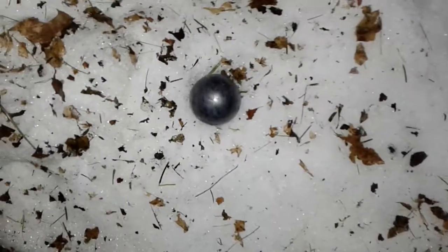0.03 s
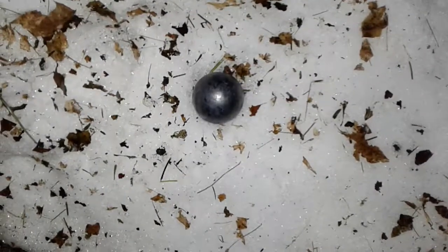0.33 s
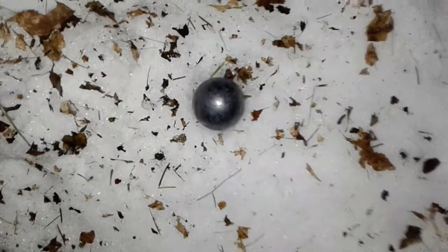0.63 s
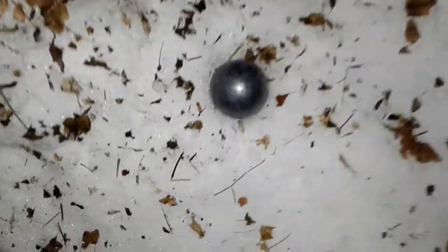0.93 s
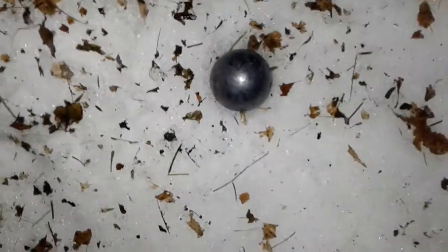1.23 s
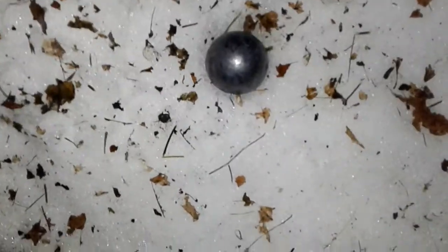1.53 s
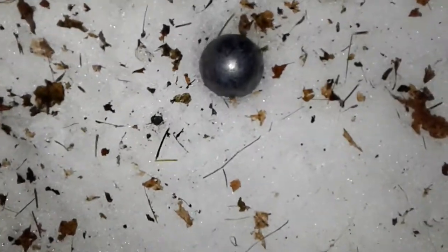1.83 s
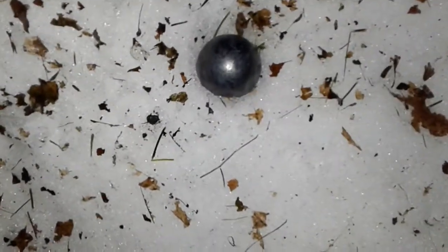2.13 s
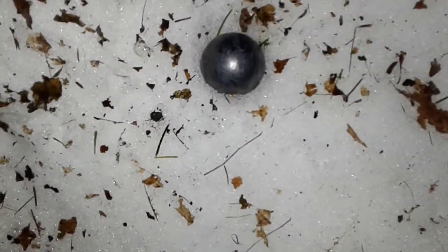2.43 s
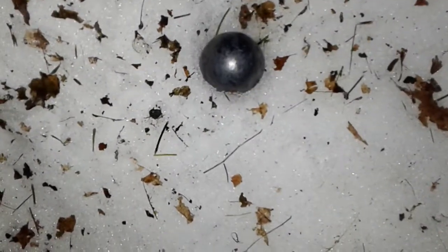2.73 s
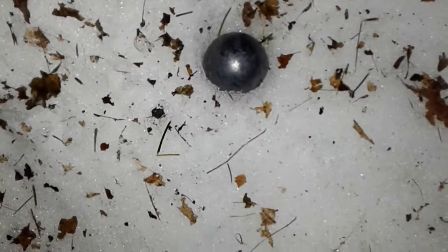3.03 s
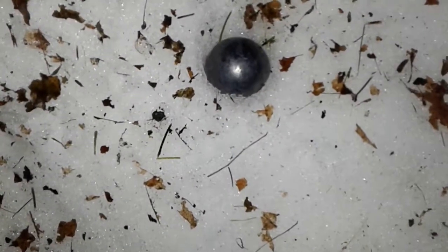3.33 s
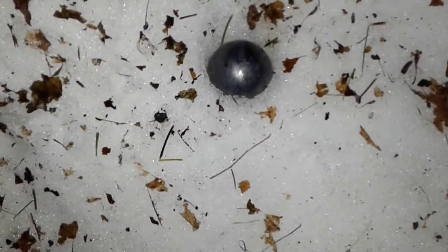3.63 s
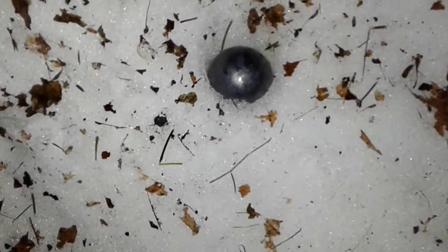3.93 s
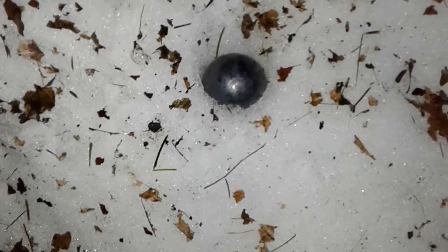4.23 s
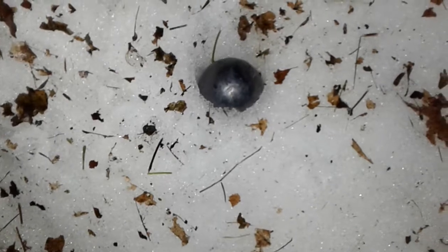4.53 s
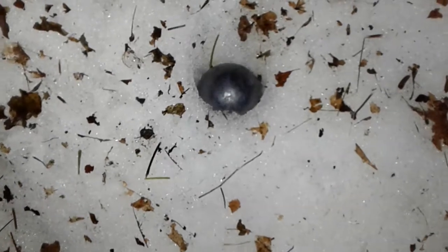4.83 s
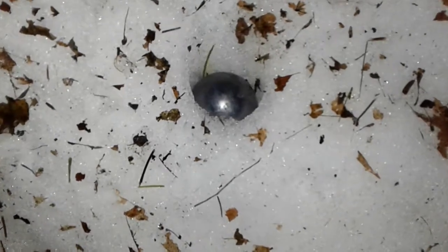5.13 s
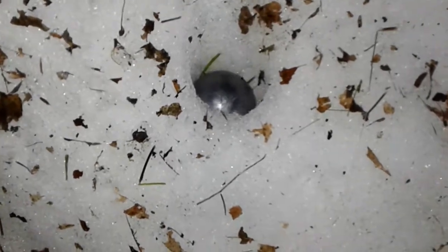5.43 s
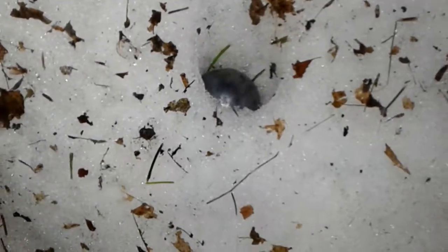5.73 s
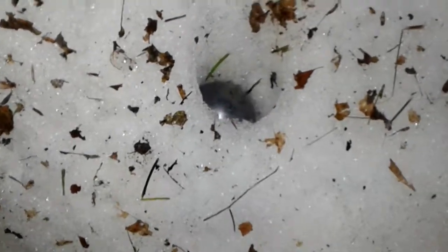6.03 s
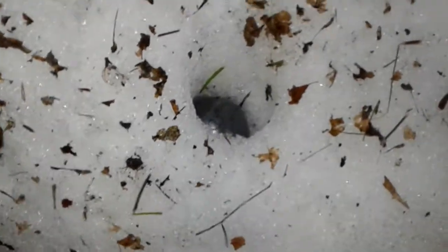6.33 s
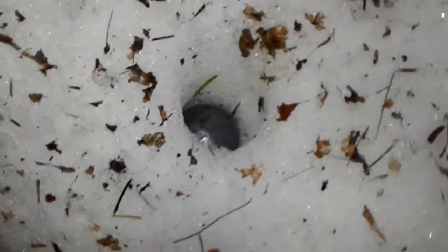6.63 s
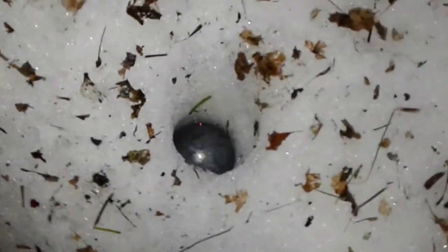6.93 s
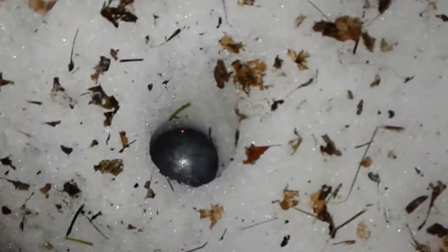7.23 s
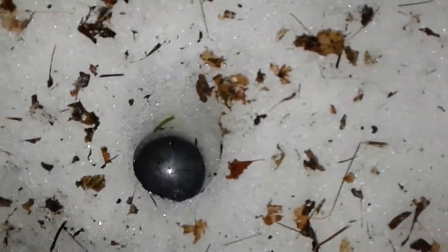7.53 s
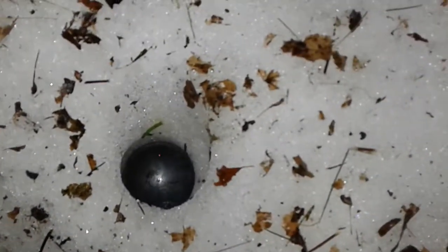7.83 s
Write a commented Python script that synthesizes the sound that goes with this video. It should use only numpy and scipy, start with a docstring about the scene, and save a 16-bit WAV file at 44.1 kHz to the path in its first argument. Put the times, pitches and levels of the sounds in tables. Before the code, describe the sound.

A very hot metal ball rests on snow outdoors, close to the microphone, fizzing thinly over a faint simmer. Gusts of wind thud and flutter, mostly on the left, and a few ice grains tick. About five seconds in, with the wind now weaker, the ball sinks and meltwater boils into a louder, sputtering hiss with brief spits. The wind thumps again near the end.

```python
"""A very hot metal ball melts its way into snow, outdoors, close to a camera with two microphone ports.
At first it fizzes thinly on a film of steam, with a soft simmer underneath. Then meltwater touches the
metal and boils, hissing and spitting in the hole. A few ice grains snap. Gusts of wind thud and flutter
on the exposed left port and rumble on the sheltered right one, over a soft outdoor background."""
import sys
import numpy as np
from scipy import signal
from scipy.fft import rfft, irfft, next_fast_len
from scipy.io import wavfile
from scipy.ndimage import uniform_filter1d

SR = 44100
rng = np.random.default_rng(int(sys.argv[2]) if len(sys.argv) > 2 else 0)


def dump(signal):
    """Clip the signal to [-1, 1] and save it as 16-bit WAV at the path in sys.argv[1]."""
    limited = np.clip(np.atleast_2d(signal).T, -1, 1)
    pcm = np.round(limited * 32767).astype(np.int16)
    wavfile.write(sys.argv[1], SR, pcm)


N = 356769
TIME = np.arange(N) / SR
EDGE_HZ = 15800  # the sound is cut off above this
FRAME, HOP = 512, 128  # the hiss is built in short overlapping frames: length and step in samples
FRAME_S = np.arange(N // HOP + 5) * HOP / SR
BIN_HZ = np.fft.rfftfreq(FRAME, 1 / SR)


def steam(film_db=4, boil_db=4.5, waver_db=0.5, sputter_db=0.6, patchy_db=1.34):
    """The steam film fizzes and the meltwater boils, together making one sputtering hiss."""
    # tone of the fizz: (frequency [Hz], relative level [dB])
    film_colour = [(500, -44), (1500, -22), (2300, -15.5), (3800, -11), (4600, -10), (6000, -2.5),
                   (7400, -3), (8800, 0), (10500, 0), (12000, 0), (14000, -0.5), (15600, 1)]
    # narrow bands where the camera body rings: (frequency [Hz], width [octaves], boost [dB])
    case_modes = [(4460, .07, 2.5), (6800, 0.035, 1), (9330, 0.05, 1.16)]
    t = FRAME_S[:, None]
    film, boil = steam_levels(t)
    film = film * amp(film_db + waver_db * wobble(frames=36)) * hiss_shape(read(film_colour, BIN_HZ))
    boil = boil * amp(boil_db) * hiss_shape(boiling_colour(t))
    gain = np.hypot(film, boil)
    sputter = wobble(frames=7)
    # small patches of time and frequency get randomly louder or softer
    patches = uniform_filter1d(rng.standard_normal(gain.shape), size=16, axis=0)
    patches = evened(uniform_filter1d(patches, size=7, axis=1))
    gain = gain * amp(peaks_db(case_modes) + sputter_db * sputter + patchy_db * patches)
    return hiss_at_ports(gain, t)


def steam_levels(t, dry_db=-9):
    """How strong the fizz and the boiling are: both surge when the ball slips against fresh snow."""
    # fizz of the steam film, thicker once the ball sinks: (time [s], relative level [dB])
    film_levels = [(0, -49), (1.55, -47), (1.72, -44), (2.2, -47.5), (2.9, -45.5), (3.6, -48.5),
                   (4.5, -48.5), (5.14, -41.5), (5.19, -34), (5.55, -42.5), (6.5, -33), (6.8, -41.5),
                   (8.09, -43)]
    # boiling where water touches the metal: (time [s], relative level [dB])
    boil_levels = [(4.5, -71), (4.9, -55), (5.14, -48), (5.2, -40), (5.7, -32), (6.55, -32), (6.78, -35.5),
                   (7.12, -37), (7.4, -38), (7.7, -37), (8.09, -37)]
    # surges of steam: (start [s], length [s], relative fizz level [dB], relative boiling level [dB])
    surges = [(4.602, 0.061, -37, -52.5), (4.924, 0.084, -42, -58), (5.984, .07, -33, -36.5),
              (6.205, 0.071, -31.5, -41), (6.555, 0.065, -33, -31), (7.03, .1, -38, -39),
              (7.58, 0.12, -38, -39)]
    film_holds = t < boil_levels[0][0]  # hardly any water reaches the metal yet
    film = amp(curve(film_levels, t)[0])
    boil = amp(curve(boil_levels, t)[0] + dry_db * film_holds)
    for start, length, fizz_db, boil_db in surges:
        surge = swell(t, start, length, rise_s=0.047, fall_s=0.1)
        film = np.hypot(film, amp(fizz_db) * surge)
        boil = np.hypot(boil, amp(boil_db) * surge)
    return film, boil


def boiling_colour(t):
    """The tone of the boiling, in dB, shifts as water pools and the ball sinks in its ringing hole."""
    # tone of water boiling on the metal: (frequency [Hz], relative level [dB])
    contact_colour = [(200, -33), (500, -23.5), (900, -12), (1500, -8), (2400, -8), (3100, -4.5),
                      (4000, -5), (5000, -5), (5900, -1), (7300, -2), (9000, -3), (11000, -5), (13000, -8),
                      (15600, -9.5)]
    # tone of pooled water boiling: (frequency [Hz], relative level [dB])
    pool_colour = [(200, -23), (500, -21), (900, -9), (1500, -8), (2400, -1), (3100, 1), (4000, -2.5),
                   (5000, 0.5), (5900, 4.5), (7300, -3.5), (9000, 5), (11000, -5), (13000, -8.5),
                   (15600, -7)]
    # the hole around the ball: (time [s], share of boiling from pooled water [0-1], lowest ring [Hz])
    hole = [(4.6, 0., 2150), (5.2, 0.86, 2260), (5.7, 0., 1750), (6.1, 0.46, 1790), (6.5, 0.53, 2470),
            (6.9, 0.2, 2380), (7.35, 0.7, 2190), (8.09, 0.9, 2440)]
    # bands where the hole rings: (multiple of the lowest ring, width [octaves], boost [dB])
    hole_modes = [(1., 0.21, 3), (2.45, 0.11, 0.5)]
    pooled, hole_hz = curve(hole, t)
    water_db = (1 - pooled) * read(contact_colour, BIN_HZ) + pooled * read(pool_colour, BIN_HZ)
    ring_db = sum(db * hump(BIN_HZ, multiple * hole_hz, octaves) for multiple, octaves, db in hole_modes)
    return water_db + ring_db


def steam_bursts(per_s=4000, spread_db=3, pop_share=0.28):
    """Tiny steam bursts pop in a smooth rush of vapour; gives one spectrum for each frame."""
    count = len(FRAME_S) * HOP
    pops = evened(random_kicks(count, per_s, spread_db))
    rush = rng.standard_normal(count)
    hiss = np.sqrt(pop_share) * pops + np.sqrt(1 - pop_share) * rush
    return signal.stft(hiss, nperseg=FRAME, noverlap=FRAME - HOP)[2].T[:len(FRAME_S)]


def hiss_at_ports(gain, t):
    """The two ports sit apart, so they hear nearly the same low hiss but different treble."""
    # where the ball lies: (time [s], left port boost [dB], direction [0 ahead, 1 to the side])
    aim = [(0, 2, 0.9), (4.6, 2, 1.), (5.7, 2.5, 1), (6.4, 1, 0.78), (6.9, 2.5, 0.54), (7.3, 2, 0.2),
           (8.09, 3.5, 0.)]
    # how alike the hiss is at the two ports: (frequency [Hz], likeness [0-1])
    likeness = [(500, 0.97), (1700, 0.84), (3300, 0.65), (4300, 0.6), (5200, 0.52), (6500, 0.4),
                (7500, 0.74), (9000, 0.03), (13000, 0.05)]
    # how far the left wave leads with the ball to the side: (frequency [Hz], phase [radians])
    phase_aside = [(1000, 0), (2200, -0.7), (3000, -3.3), (4000, -6), (4500, -6.6), (5500, -8.8),
                   (6800, -11.3), (8200, -10.3), (10500, -12), (12000, -13.5), (15600, -22)]
    # the same with the ball straight ahead: (frequency [Hz], phase [radians])
    phase_ahead = [(1000, 0.2), (2500, 0.1), (3400, -0.1), (4300, 1.6), (5200, 0.1), (6200, -0.4),
                   (7000, -2), (7700, 0.6), (10000, -1), (15600, -2.7)]
    # tone of the left port against the right: (frequency [Hz], relative level [dB])
    left_colour = [(1100, -2), (2100, 2.5), (2700, -2), (3300, -8), (4600, -2.1), (5300, -3.5), (6500, -6),
                   (7400, -9.5), (8700, -2.5), (9800, -5), (11500, -11), (13000, -15.5), (15600, -4.5)]
    # narrow peaks and dips of the left port: (frequency [Hz], width [octaves], boost [dB])
    left_ripple = [(1980, 0.051, 0.5), (3270, 0.1, 0), (7600, 0.043, -3.5), (11500, .05, -2),
                   (12500, .05, 3)]
    left_db, aside = curve(aim, t)
    right, unrelated = steam_bursts(), steam_bursts()
    alike = np.clip(read(likeness, BIN_HZ), 0, 1)
    left = alike * right + np.sqrt(1 - alike ** 2) * unrelated
    turn_aside = np.exp(1j * read(phase_aside, BIN_HZ))
    turn_ahead = np.exp(1j * read(phase_ahead, BIN_HZ))
    lead = np.angle(aside * turn_aside + (1 - aside) * turn_ahead)
    left = left * np.exp(1j * lead) * amp(read(left_colour, BIN_HZ) + peaks_db(left_ripple) + left_db)
    ports = gain * np.array([left, right])
    return signal.istft(ports.transpose(0, 2, 1), nperseg=FRAME, noverlap=FRAME - HOP)[1][:, :N]


def simmer(hz=2150, octaves=0.3, right_db=-5):
    """Vapour escapes through the narrow gap under the ball, which rings broadly."""
    # soft simmer under the ball: (time [s], level at the left port [dB])
    levels = [(0, -66.5), (.8, -64.5), (1.25, -62), (1.55, -61.5), (2.0, -54.5), (2.3, -62.5), (2.7, -66),
              (3.2, -92), (4.4, -68), (5., -63)]
    vapour = noise_band(N, hz, octaves)
    return amp(curve(levels, TIME)[0]) * vapour * amp([[0], [right_db]])


def spits():
    """Steam spits out in puffs of noise that rise quickly and fall more slowly."""
    # puffs: (time [s], level [dB], pitch [Hz], width [octaves], rough length [s], left over right [dB])
    puffs = [(0.997, -35.5, 10300, 0.19, 0.024, -7), (4.63, -40.5, 5730, .5, 0.036, -2),
             (6.445, -35.5, 2150, 0.3, 0.041, 14), (6.586, -32, 1790, 0.3, 0.06, 12),
             (6.593, -38, 766, 0.47, 0.096, 4), (6.704, -29.5, 4000, 5.6, 0.025, 8),
             (7.077, -43, 8640, 0.18, 0.26, 18)]
    out = np.zeros((2, N))
    t = np.arange(SR // 4) / SR
    for start, db, hz, octaves, length, pan_db in puffs:
        puff = noise_band(len(t), hz, octaves) * rise_and_fade(t, peak_s=length / 4)
        add(out, start, panned(puff, db, pan_db))
    return out


def ice_ticks():
    """A grain of ice snaps and rings for a few cycles."""
    # snaps: (time [s], level [dB], ring [Hz], time to peak [s], left over right [dB])
    snaps = [(1.242, -16.5, 6460, 0.00014, 8), (1.342, -30, 5570, 0.00014, 0),
             (3.8412, -19, 14300, 0.000062, -12)]
    out = np.zeros((2, N))
    t = np.arange(400) / SR
    for start, db, hz, peak_s, pan_db in snaps:
        ring = rise_and_fade(t, peak_s) * np.sin(2 * np.pi * hz * t)
        add(out, start, panned(ring, db, pan_db))
    return out


def wind(top_hz=1200, rise_s=0.046, fall_s=0.053):
    """Gusts ride on a breeze: big swirls of air thud, small ones flutter, the sheltered port rumbles."""
    # breeze between gusts: (time [s], relative level on the left [dB], on the right [dB])
    breeze = [(0, -55, -47), (.35, -45, -46), (.9, -29.5, -44), (1.1, -27.5, -36.5), (1.4, -26.5, -37),
              (1.8, -40, -49), (2.2, -36, -57), (2.8, -35, -55), (3.2, -39.5, -53), (4.1, -42, -57.5),
              (4.9, -37, -55), (5.6, -44.5, -62), (6.5, -52, -57), (6.75, -43.5, -58), (7.2, -51.5, -59),
              (7.3, -39, -42), (7.75, -36.5, -52), (8.09, -36, -33)]
    # gusts on the exposed left port: (start [s], length [s], level [dB], small swirls against big [dB])
    gusts = [(0.112, .16, -34, -43), (0.31, 0.074, -23, -20.5), (.46, 0.04, -25, -26),
             (.58, 0.076, -23.5, -17), (0.664, 0.077, -18, -16), (0.812, 0.09, -21, -22),
             (1.042, 0.07, -20.5, -15), (1.137, 0.15, -17.5, -9.5), (1.448, 0.051, -21.5, -15),
             (1.622, 0.058, -21.5, -10.5), (1.712, 0.02, -34.5, 4.5), (1.874, .09, -32, -1),
             (1.999, 0.27, -30.5, -2), (2.344, 0.22, -33.5, -5), (2.71, 0.14, -33, -5),
             (2.916, .17, -31.5, -3), (3.262, 0.029, -32, -9), (3.345, 0.097, -29.5, -10),
             (3.48, 0.34, -40, -9), (3.887, 0.14, -34, -8.5), (4.198, .13, -32, -7.5),
             (4.391, .13, -33, -8), (4.56, 0.067, -33, -7), (4.765, 0.087, -34.5, -11),
             (4.896, 0.22, -35, -2), (5.15, 0.098, -39, -0.5), (5.346, 0.019, -35.5, -2),
             (5.424, 0.029, -33, -9.5), (5.507, .11, -42, -5.5), (5.746, 0.089, -34, -16),
             (5.852, 0.071, -31.5, -8.5), (6.066, 0.057, -35, -14), (6.32, 0.029, -36.5, -23),
             (6.827, 0.1, -34, -15.5), (7.067, 0.075, -34, -21), (7.386, 0.038, -26, -16),
             (7.506, 0.17, -26, -17.5), (7.739, 0.21, -21.5, -16)]
    # stray gusts on the sheltered right port: (start [s], length [s], relative level [dB])
    stray_gusts = [(2.56, 0.17, -47), (3.016, 0.033, -45), (6.18, 0.065, -50), (6.42, 0.036, -48.5),
                   (6.66, 0.085, -50)]
    # tone of the wind on the left: (frequency [Hz], relative level [dB])
    exposed_colour = [(15, -58), (25, -41), (86, -1), (139, 4), (192, 2.5), (401, -5), (528, -10),
                      (977, -31), (1500, -38.5), (1950, -69), (3300, -120)]
    # tone of the wind on the right: (frequency [Hz], relative level [dB])
    sheltered_colour = [(20, -43), (50, -1), (90, 0), (150, -2.5), (250, -16), (400, -33), (800, -60)]
    big, sheltered = amp(curve(breeze, TIME))
    small = big * amp(-16)  # small swirls are weak between gusts
    for start, length, db, small_db in gusts:
        gust = amp(db) * swell(TIME, start, length, rise_s, fall_s)
        big = np.hypot(big, gust)
        small = np.hypot(small, amp(small_db) * gust)
    for start, length, db in stray_gusts:
        sheltered = np.hypot(sheltered, amp(db) * swell(TIME, start, length, rise_s, fall_s))
    kicks = swirls(exposed_colour, top_hz, per_s=550, spread_db=3)
    thud = coloured(kicks, lambda f: 1 / (1 + (f / 360) ** 6))  # big swirls lie below 360 Hz
    left = big * steady(thud, samples=3200) + small * steady(kicks - thud, samples=3200)
    rumble = swirls(sheltered_colour, top_hz, per_s=710, spread_db=1.5)
    right = amp(0.5) * sheltered * steady(rumble, samples=3000)
    return np.array([left * flutter(depth_db=1.98, hz=12.6), right * flutter(depth_db=2.5, hz=6.3)])


def swirls(colour, top_hz, per_s, spread_db):
    """Swirls of air cross a port as separate dull kicks of pressure."""
    kicks = random_kicks(N, per_s, spread_db)
    return coloured(kicks, lambda f: amp(read(colour, f)) / np.hypot(1, (f / top_hz) ** 4))


def flutter(depth_db, hz):
    """Swirls come in bunches: a gain that wanders about hz times a second."""
    return amp(depth_db * noise_band(N, hz, octaves=1))


def buffets():
    """One strong swirl of air sucks and then pushes on the left port."""
    # the hardest blows of the wind: (time [s], peak level [dB], main frequency [Hz])
    blows = [(0.711, -16, 310), (0.84, -21, 273), (1.145, -17, 380), (1.162, -9, 298), (1.218, -17, 416),
             (1.652, -25, 418), (1.737, -20, 520), (1.915, -20.5, 473), (2.065, -21, 453),
             (2.143, -24, 487), (4.444, -21.5, 380), (7.761, -10.5, 243)]
    out = np.zeros((2, N))
    t = np.arange(-400, 400) / SR
    for middle, db, hz in blows:
        phase = 2 * np.pi * hz * t
        pressure = amp(db) * phase * np.exp((1 - phase ** 2) / 2)
        add(out, middle + t[0], np.outer([1, 0], pressure))
    return out


def air(level_db=-57.5, top_hz=3500):
    """A soft, steady outdoor background, separate in each port."""
    # tone of the background: (frequency [Hz], relative level [dB])
    colour = [(60, 0), (300, -2), (430, -5), (520, -1.5), (620, 3.5), (760, -2.5), (900, -1), (1200, -6.5),
              (1800, -8.5), (3000, -36)]
    gain = lambda f: amp(read(colour, f)) / np.hypot(1, (f / top_hz) ** 2)
    return amp(level_db) * np.array([evened(coloured(rng.standard_normal(N), gain)) for _ in range(2)])


def amp(db):
    """Turns decibels into a gain."""
    return 10 ** (np.asarray(db) / 20)


def evened(x):
    """Scales x to an average (rms) level of 1."""
    return x / np.sqrt(np.mean(x ** 2) + 1e-20)


def steady(x, samples):
    """Evens out slow changes of level and leaves the fast lumps."""
    power = uniform_filter1d(uniform_filter1d(x ** 2, samples), samples)
    return x / np.sqrt(abs(power) + 1e-12)


def curve(rows, t):
    """Looks up each column of a table at the times t."""
    times, *columns = np.transpose(rows)
    return [np.interp(t, times, column) for column in columns]


def read(points, hz):
    """Looks up a table at the frequencies hz, with octaves evenly spaced."""
    f, value = np.transpose(points)
    return np.interp(np.log(hz + 1), np.log(f + 1), value)


def hump(f, hz, octaves):
    """A bell curve around hz, with its width in octaves."""
    return np.exp(-.5 * (np.log2((f + 1) / hz) / octaves) ** 2)


def peaks_db(rows):
    """Adds narrow peaks and dips into one tone curve."""
    return sum(db * hump(BIN_HZ, hz, octaves) for hz, octaves, db in rows)


def hiss_shape(db):
    """Turns a tone curve into gains that keep the overall power the same."""
    gain = amp(db) * (BIN_HZ < EDGE_HZ + 300)
    return gain / np.sqrt(np.mean(gain ** 2, axis=-1, keepdims=True))


def coloured(x, gain):
    """Filters x by a gain that depends on frequency."""
    size = next_fast_len(len(x) + 2048)
    return irfft(rfft(x, size) * gain(np.fft.rfftfreq(size, 1 / SR)), size)[:len(x)]


def noise_band(count, hz, octaves):
    """Noise in one band around hz."""
    return evened(coloured(rng.standard_normal(count), lambda f: hump(f, hz, octaves)))


def random_kicks(count, per_s, spread_db):
    """Clicks of uneven size at random moments."""
    size = amp(spread_db * np.minimum(rng.exponential(1, count), 4))
    return size * rng.choice([-1, 1], count) * (rng.random(count) < per_s / SR)


def wobble(frames):
    """A random drift, smoothed over this many frames."""
    return evened(uniform_filter1d(rng.standard_normal((len(FRAME_S), 1)), size=frames, axis=0))


def swell(t, start, length, rise_s, fall_s):
    """A level that rises around its start, holds, and dies away."""
    rise = np.clip((t - start) / rise_s + .5, 0, 1)
    return rise * np.exp(-2 * np.maximum(t - start - length, 0) / fall_s)


def rise_and_fade(t, peak_s):
    """A level that climbs to 1 at peak_s and then fades."""
    return t / peak_s * np.exp(1 - t / peak_s)


def panned(sound, db, pan_db):
    """Makes a sound stereo, with the left side pan_db above the right."""
    return amp(db + np.array([[pan_db], [-pan_db]]) / 2) * sound


def add(mix, start_s, sound):
    """Mixes a stereo sound in at start_s."""
    part = mix[:, max(round(start_s * SR), 0):][:, :sound.shape[1]]
    part += sound[:, :part.shape[1]]


def scene():
    """The hot ball in the snow, with wind and outdoor air."""
    return steam() + simmer() + spits() + ice_ticks() + wind() + buffets() + air()


def record(dry):
    """Cuts off the very highest treble."""
    low_pass = signal.firwin(511, EDGE_HZ, window=("kaiser", 9), fs=SR)
    return signal.oaconvolve(dry, low_pass[None], "same")


dry = scene()
out = record(dry)
dump(out)
```